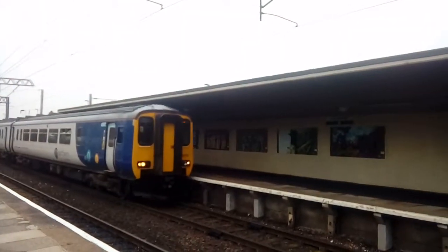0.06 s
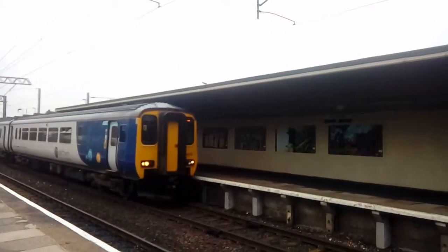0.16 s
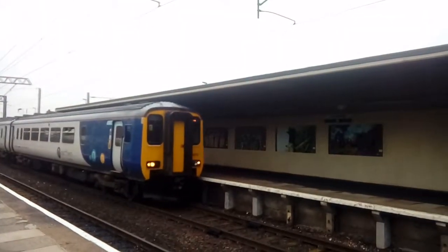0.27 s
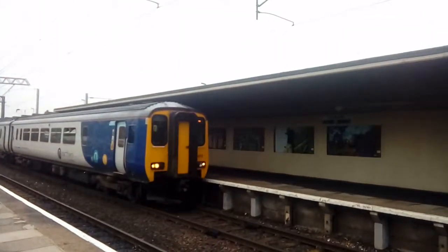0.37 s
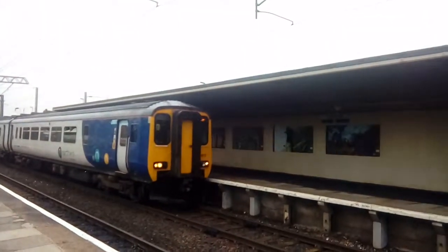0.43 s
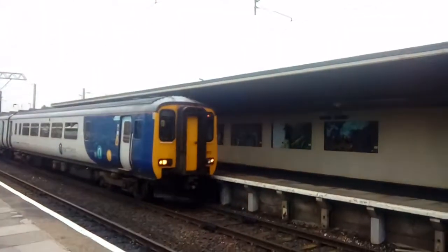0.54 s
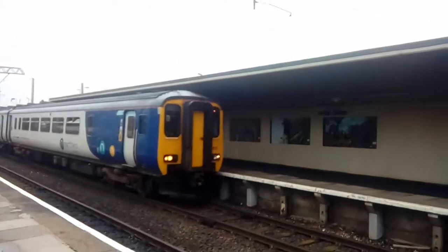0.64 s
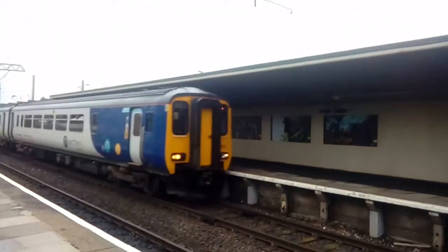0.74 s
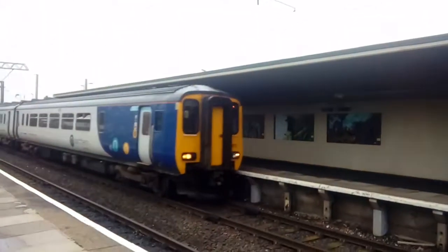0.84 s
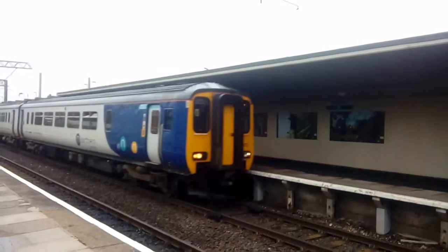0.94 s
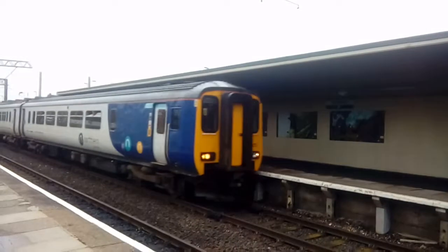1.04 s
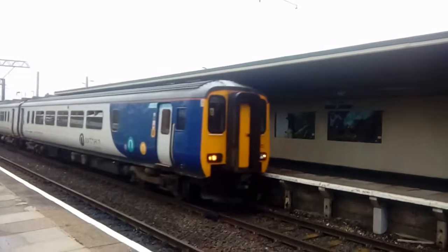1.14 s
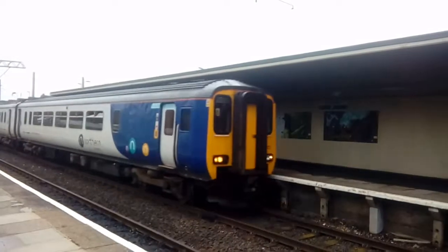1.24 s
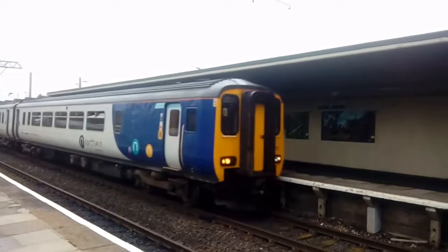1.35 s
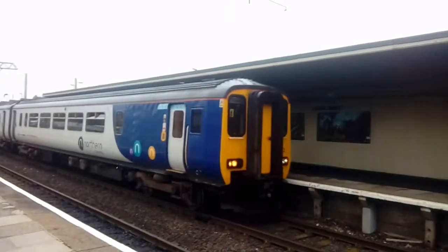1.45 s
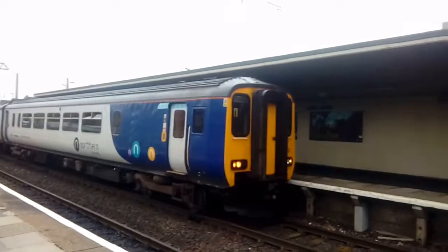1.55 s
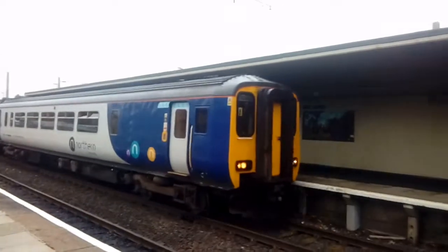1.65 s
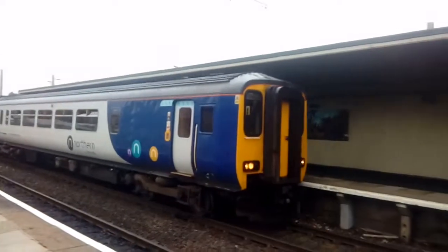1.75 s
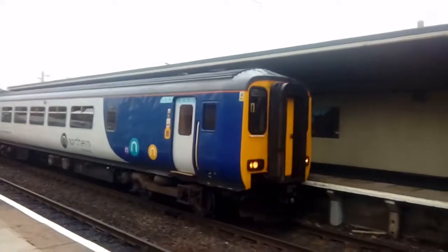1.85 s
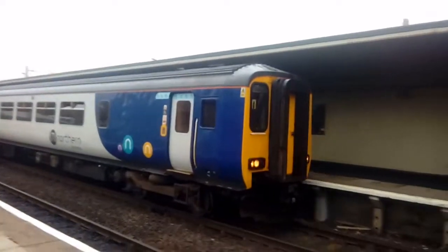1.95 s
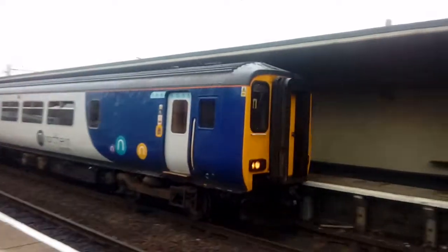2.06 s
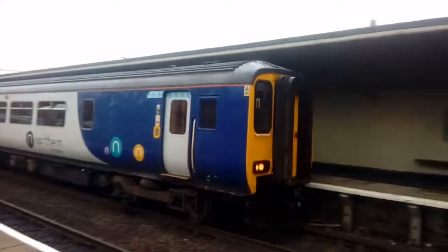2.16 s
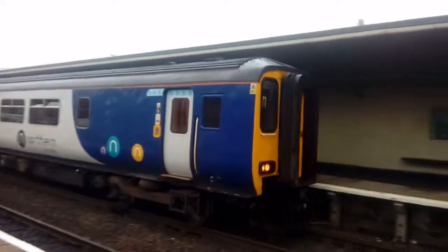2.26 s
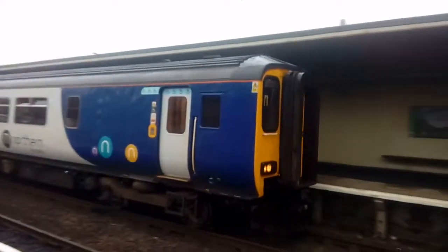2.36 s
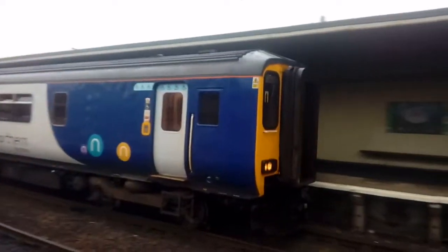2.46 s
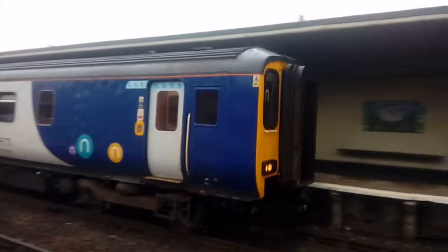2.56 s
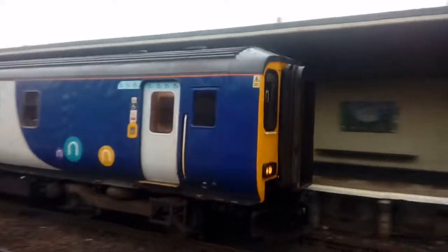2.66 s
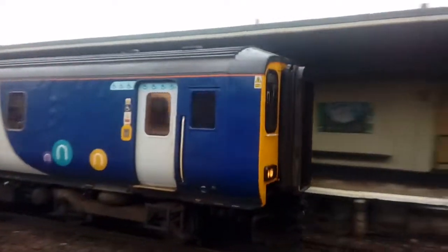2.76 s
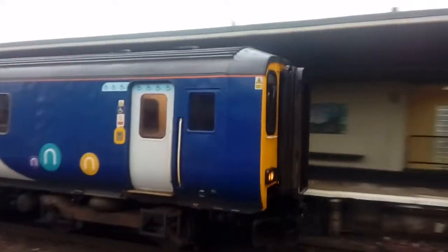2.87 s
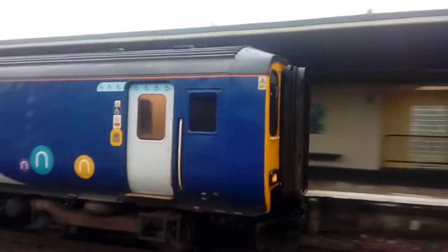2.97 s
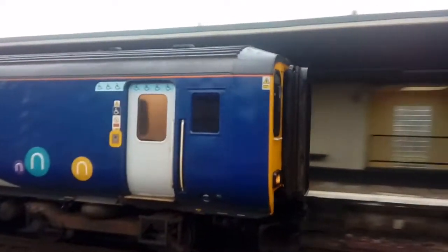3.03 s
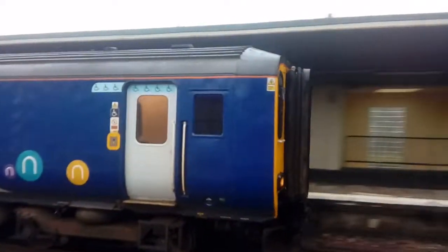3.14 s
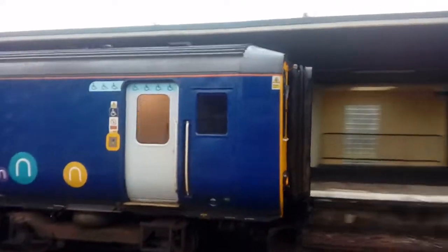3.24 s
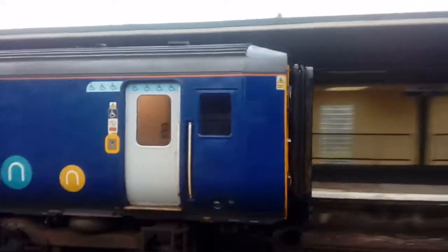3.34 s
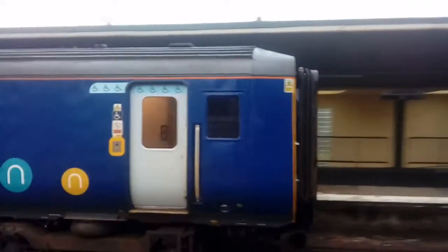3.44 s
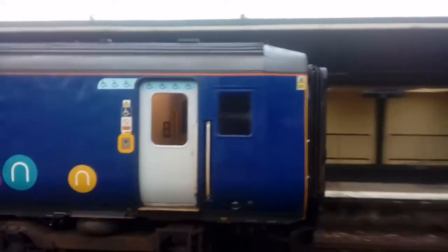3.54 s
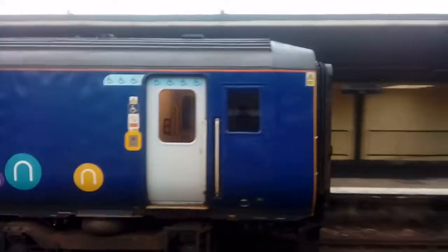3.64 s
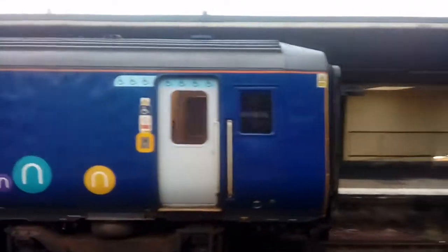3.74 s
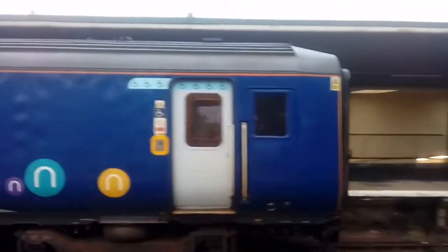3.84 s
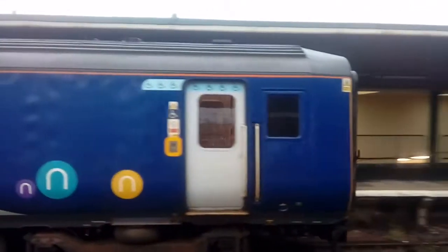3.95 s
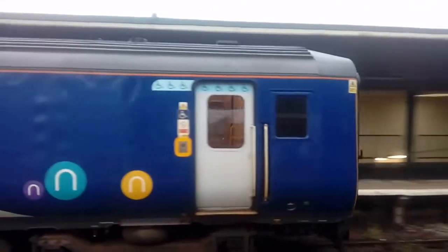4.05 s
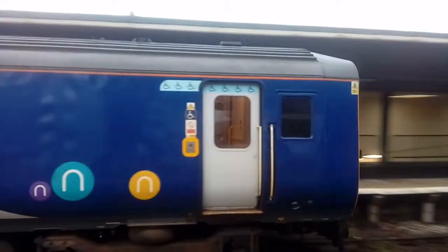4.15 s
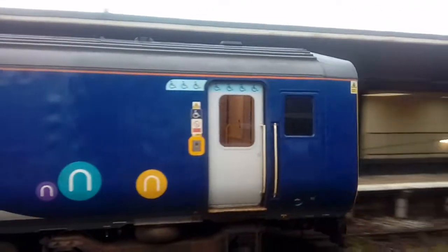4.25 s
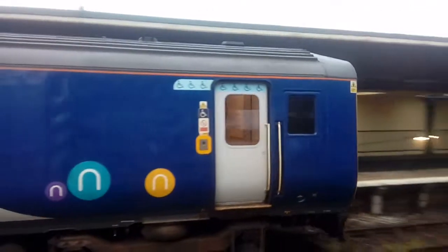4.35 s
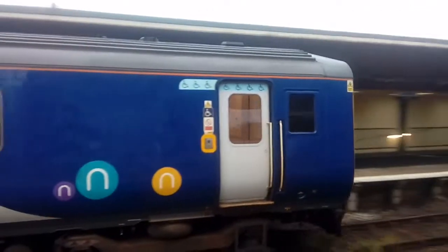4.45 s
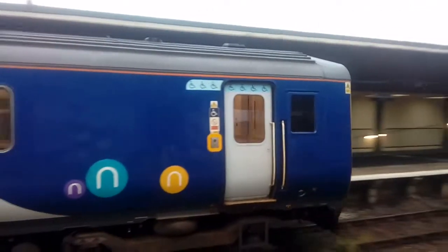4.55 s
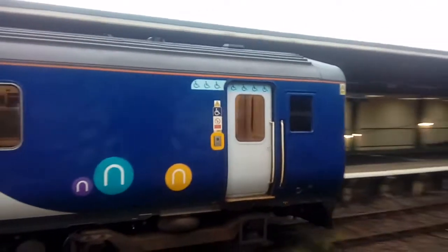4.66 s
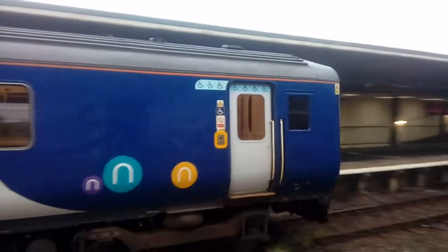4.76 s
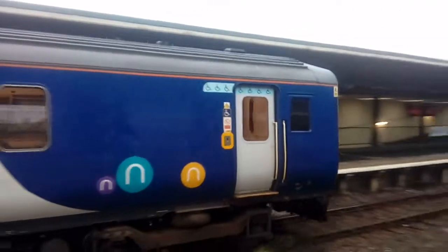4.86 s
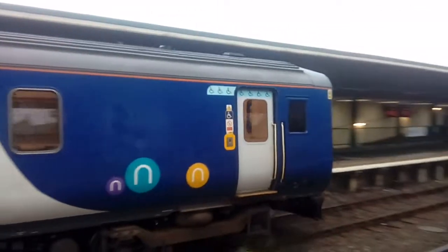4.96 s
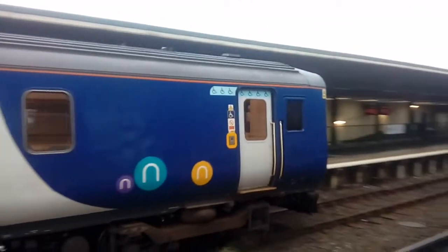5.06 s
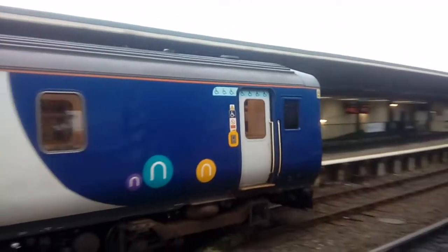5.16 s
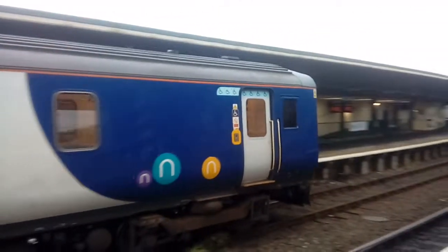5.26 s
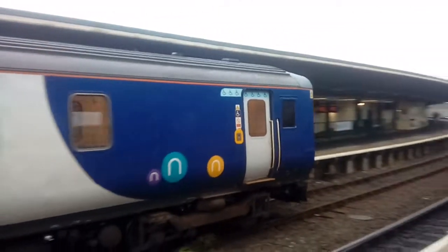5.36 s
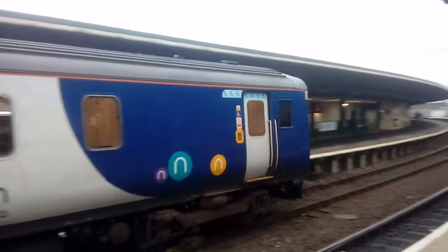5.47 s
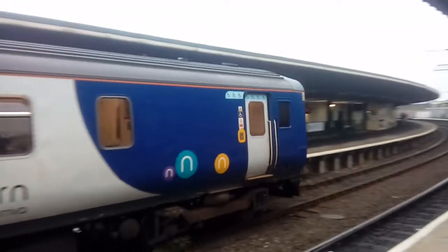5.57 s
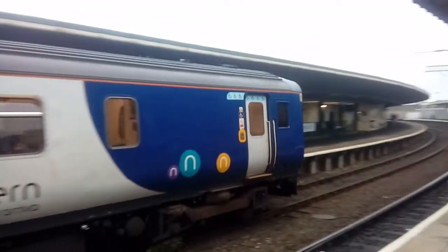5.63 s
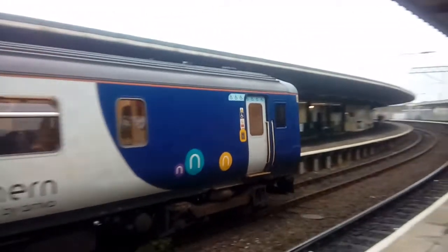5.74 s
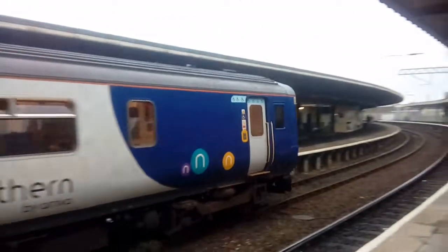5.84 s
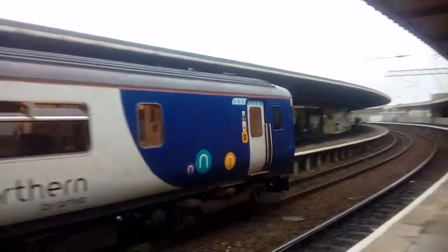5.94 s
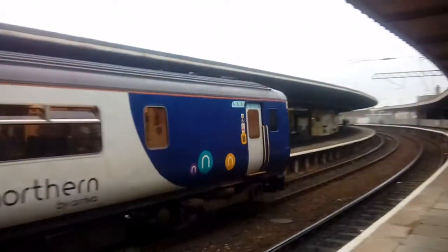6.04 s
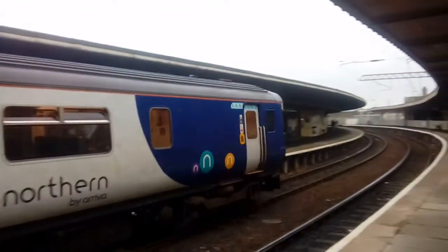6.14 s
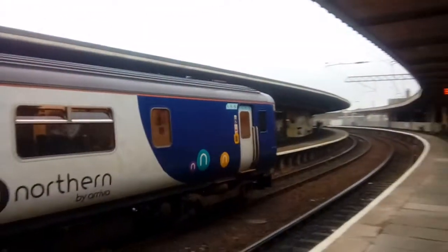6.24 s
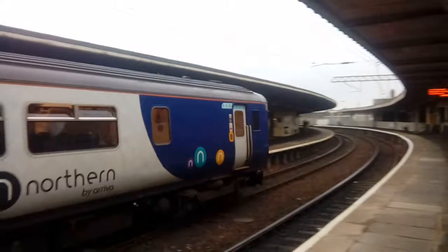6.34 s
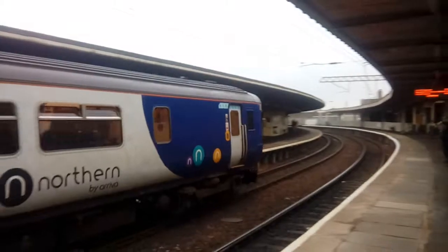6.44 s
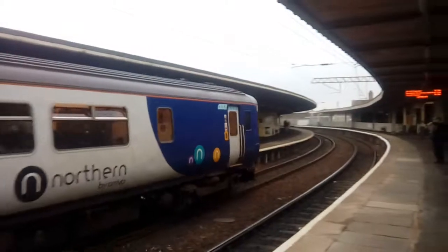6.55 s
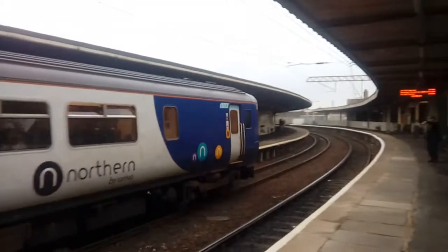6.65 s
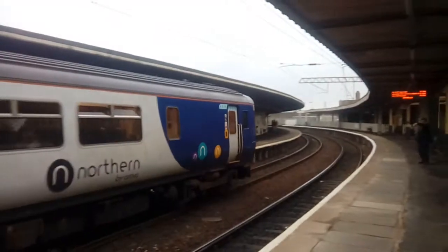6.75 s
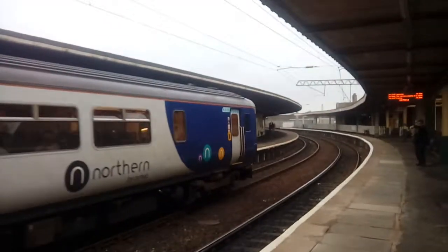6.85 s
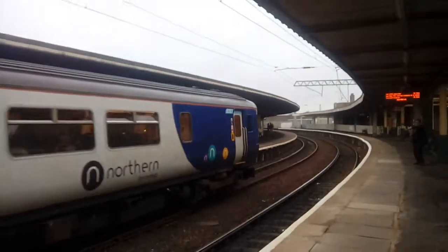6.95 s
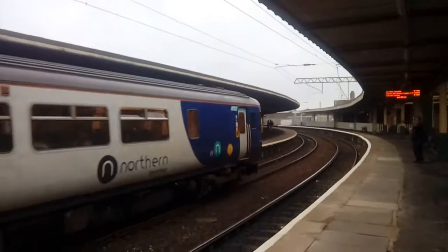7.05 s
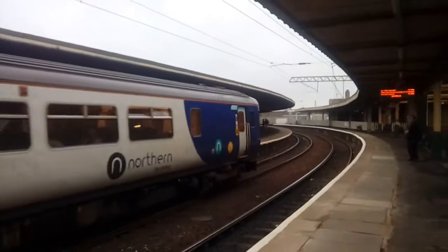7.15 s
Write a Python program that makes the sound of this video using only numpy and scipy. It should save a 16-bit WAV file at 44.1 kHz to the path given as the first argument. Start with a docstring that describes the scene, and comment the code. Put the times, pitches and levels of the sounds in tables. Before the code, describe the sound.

Close pass of a railcar at a covered outdoor platform: rough wheel roar, low ground rumble and rattling diesel knock grow throughout. Metallic joint clanks with short ringing tails punctuate it, wavering wheel tones sing in the middle and again late, and low booms sound under the carriage. Brief airy hisses come and go. The engine is loudest and brightest at the end; small dull-topped microphone, short roof reflections.

```python
"""A railcar roar swells as it passes close to a platform, with clanks, ringing wheels, thuds and short hisses.
Engine clatter grows nearer and brighter towards the end. Rolling, engine and exhaust are shaped noise with
gains set by distance; crankshaft-locked strokes modulate the engine and exhaust. Joints excite decaying
noise and frame modes; whines, booms and hisses are swelling noise bands. Engine and joints echo off the canopy."""
import sys
import numpy as np
from scipy import signal
from scipy.fft import rfft, irfft, next_fast_len
from scipy.io import wavfile
from scipy.ndimage import map_coordinates

SR = 44100
rng = np.random.default_rng(int(sys.argv[2]) if len(sys.argv) > 2 else 0)


def transcribe(signal):
    """Save signal, clipped to [-1, 1], as a 16-bit WAV file at the path in sys.argv[1]."""
    frames = np.atleast_2d(signal).T
    limited = np.clip(frames, -1, 1)
    pcm = np.round(limited * 32767).astype(np.int16)
    wavfile.write(sys.argv[1], SR, pcm)


N = 317520
T = np.arange(N) / SR  # s

SHAFT_HZ = 12.34
SPEED_M_PER_S = 4.1
DISTANCE_M = 4.76  # microphone to the near side of the train
# when each part draws level with the microphone
EXHAUST_PASS_S, FRAME_PASS_S, ENGINE_PASS_S = 4.79, 5.84, 6.91

# firing strength of each cylinder in turn: (relative strength)
CYLINDER_STRENGTHS = [1.16, 0.61, 1.2, 1.1, 0.96, 0.96]


def amp(db):
    """Decibels to gain."""
    return 10 ** (np.asarray(db) / 20)


def unit(x):
    """Scaled to rms 1."""
    return x / np.sqrt(np.mean(x ** 2) + 1e-20)


def along(points, hz):
    """(Hz, value) points interpolated on a log frequency axis."""
    point_hz, values = np.transpose(points)
    return np.interp(np.log(hz + 1), np.log(point_hz + 1), values)


def wobble(knots_per_s):
    """Smooth random curve: a spline through Gaussian knots."""
    knots = rng.standard_normal(int(N * knots_per_s / SR) + 4)
    return map_coordinates(knots, [T * knots_per_s])


def filtered(x, response):
    """x times a response of frequency, zero-padded against wrap-around."""
    size = next_fast_len(N + SR // 2)
    spectrum = rfft(x, size) * response(np.fft.rfftfreq(size, 1 / SR))
    return irfft(spectrum, size)[:N]


def coloured(x, spectrum):
    """x shaped by (Hz, dB) points, at rms 1."""
    return unit(filtered(x, lambda f: amp(along(spectrum, f))))


def resonance(f, centre_hz, width_hz):
    """Response of one damped mode, unity at its centre."""
    return 1j * f * width_hz / (centre_hz ** 2 - f * f + 1j * f * width_hz)


def noise():
    """White noise of rms 1."""
    return rng.standard_normal(N)


def contact(specks_per_s, grit):
    """Rolling contact: fine roughness plus sparse random specks."""
    specks = (rng.random(N) < specks_per_s / SR) * noise()
    return unit(noise() + grit * unit(specks))


def strokes(per_turn, strengths, decay_s, scatter_db, lag_strokes):
    """Envelope of blows locked to the crankshaft, each decaying exponentially; rms 1."""
    stroke_hz = SHAFT_HZ * per_turn
    phase = T * stroke_hz + lag_strokes + 1
    stroke = np.floor(phase).astype(int)
    age_s = (phase - stroke) / stroke_hz
    scatter = amp(scatter_db * rng.standard_normal(stroke.max() + 1))
    size = np.take(strengths, stroke, mode="wrap") * scatter[stroke]
    return unit(size * np.exp(-age_s / decay_s))


def passing(pass_s, far_db, falloff):
    """Gain of a part going by: 1 / distance ** falloff, power-summed with a steady floor for the rest."""
    distance_m = np.hypot(DISTANCE_M, SPEED_M_PER_S * (T - pass_s))
    return np.hypot((DISTANCE_M / distance_m) ** falloff, amp(far_db))


def swells(rows):
    """Resonant bands of noise under Gaussian envelopes; length is the 1/e half-width."""
    out = np.zeros(N)
    for centre_s, length_s, hz, width_hz, db in rows:
        envelope = np.exp(-((T - centre_s) / length_s) ** 2)
        band = unit(filtered(noise(), lambda f: resonance(f, hz, width_hz)))
        out += amp(db) * envelope * band
    return out


def canopy(x, wet_db, count=24):
    """Adds roof and wall echo: each successive piece of x meets a fresh decaying noise tail."""
    # reverberation time: (frequency [Hz], t60 [s])
    decay_times = [(100, 0.38), (1000, 0.19), (10000, 0.33)]
    hz, t, bins = signal.stft(rng.standard_normal((count, SR // 2)), SR, nperseg=256)
    decay = amp(-60 * t / along(decay_times, hz)[:, None])
    tails = signal.istft(bins * decay, SR, nperseg=256)[1]
    echo, start = np.zeros(N + SR), 0
    for piece, tail in zip(np.array_split(x, count), tails):
        answer = signal.fftconvolve(piece, tail / np.linalg.norm(tail))
        echo[start:start + len(answer)] += answer
        start += len(piece)
    return x + amp(wet_db) * echo[:N]


def rolling():
    """Rough wheels on rough rails shake the ground, track, wheel discs and underframe."""
    # rail roughness under the wheels: (time [s], level [dB])
    roughness = [(0, 0), (.7, -3), (1.45, 2), (2.5, 0.2), (4.2, -1), (4.7, 2), (6.4, -1), (7.0, 2)]
    # spectrum of the ground rumble: (frequency [Hz], relative level [dB])
    rumble_spectrum = [(20, -19.5), (30, -12.5), (45, -0.5), (62, 0), (85, 0.5), (125, -2.5), (180, -9.5),
                       (300, -8), (600, -46)]
    # spectrum of the track roar: (frequency [Hz], relative level [dB])
    track_spectrum = [(120, -46), (240, -25.5), (330, -15), (420, -5.5), (520, -1.5), (660, 1), (760, -5.5),
                      (1000, -35), (2500, -63)]
    # spectrum of the wheel discs: (frequency [Hz], relative level [dB])
    wheel_spectrum = [(350, -47.5), (620, -16.5), (730, -1.5), (830, 1.5), (960, -0.5), (1080, -5),
                      (1250, -8.5), (1500, -21), (3000, -55)]
    # spectrum of the underframe drone: (frequency [Hz], relative level [dB])
    underframe_spectrum = [(100, -27.5), (190, -4.5), (250, 0), (380, 0.5), (480, -6), (800, -37)]
    rough_db = np.interp(T, *np.transpose(roughness))

    rumble_gain = amp(-44.6 + rough_db) * passing(ENGINE_PASS_S, far_db=-4.5, falloff=0.6)
    rumble = rumble_gain * coloured(noise(), rumble_spectrum)

    # the rails carry the roar along, so it fades slowly with distance
    track_gain = amp(-30.5 + rough_db + 1.6 * wobble(11))
    track_gain = track_gain * passing(ENGINE_PASS_S, far_db=-21.5, falloff=0.47)
    track = track_gain * coloured(contact(specks_per_s=300, grit=0.35), track_spectrum)

    wheel_gain = amp(-24 + 0.83 * wobble(14)) * passing(ENGINE_PASS_S, far_db=-20, falloff=1.0)
    wheels = wheel_gain * coloured(contact(specks_per_s=330, grit=0.34), wheel_spectrum)

    drone_gain = amp(-40 + rough_db) * passing(FRAME_PASS_S, far_db=-28.5, falloff=1.12)
    drone = drone_gain * coloured(noise(), underframe_spectrum)
    return rumble + track + wheels + drone


def whines():
    """Faint whines and squeaks of the running gear, as narrow noise bands."""
    # whines: (centre [s], length [s], frequency [Hz], width [Hz], level [dB])
    whine_rows = [(2.68, 0.49, 615, 20, -40.5), (1.2, 2.4, 3050, 100, -51.5), (1.675, .03, 3600, 50, -40.5),
                  (6.8, .5, 3000, 40, -50)]
    return swells(whine_rows)


def booms():
    """Low booms and thuds from under the carriage, as short resonant noise."""
    # booms: (centre [s], length [s], frequency [Hz], width [Hz], level [dB])
    boom_rows = [(5.255, .041, 125, 110, -34), (5.35, 0.13, 400, 300, -31.5), (5.88, 0.13, 550, 50, -28.5),
                 (5.931, 0.014, 125, 150, -26.5), (5.99, .05, 85, 60, -35)]
    return swells(boom_rows)


def brake_hisses():
    """Short brake hisses, as high noise bands."""
    # hisses: (centre [s], length [s], frequency [Hz], width [Hz], level [dB])
    hiss_rows = [(0.034, 0.069, 6500, 4000, -40.5), (2.844, 0.08, 6960, 3000, -42.5),
                 (3.47, 0.042, 6960, 4000, -40), (4.75, 0.095, 6470, 500, -38), (4.73, .11, 9650, 600, -39),
                 (6.57, 0.048, 5200, 500, -33)]
    return swells(hiss_rows)


def singing(rest_db=-52):
    """Wheels ring in two modes; flange rubbing lifts the higher one, a noise band plus a wavering tone."""
    # flanges rubbing on the curve: (start [s], end [s], level [dB])
    rubs = [(3.02, 4.45, -36.5), (5.3, 6.6, -35.5), (6.083, 6.477, -30.5)]
    attack_s, release_s = 0.23, 0.23
    low = unit(filtered(noise(), lambda f: resonance(f, centre_hz=555.0, width_hz=34) ** 2))
    rub = unit(filtered(noise(), lambda f: resonance(f, centre_hz=904, width_hz=53) ** 2))
    pitch_hz = 889 + 6 * wobble(20)
    tone = np.sqrt(2) * np.sin(2 * np.pi * np.cumsum(pitch_hz) / SR)
    pressure = amp(rest_db)
    for start_s, end_s, db in rubs:
        attack = np.clip((T - start_s) / attack_s, 0, 1)
        release = np.exp(-np.maximum(T - end_s, 0) / release_s)
        pressure = pressure + amp(db) * attack * release
    low_gain = amp(-36.5) * passing(ENGINE_PASS_S, far_db=-9.5, falloff=1.5)
    high = unit(0.72 * rub + tone * amp(2.5 * wobble(16)))
    return low_gain * low + pressure * high


def exhaust():
    """Puffs of gas boom in the silencer, loudest when it is right opposite."""
    puffs = strokes(per_turn=3, strengths=CYLINDER_STRENGTHS, decay_s=0.008, scatter_db=-0.2, lag_strokes=.45)
    gas = puffs * (noise() + 0.043)  # the offset adds a regular pulse to the turbulence
    boom = filtered(gas, lambda f: resonance(f, centre_hz=120.3, width_hz=76) ** 2)
    return amp(-39.3) * passing(EXHAUST_PASS_S, far_db=-21, falloff=7.2) * unit(boom)


def joints(clank_t60_s=0.38, ring_t60_s=0.39, thump_t60_s=0.46):
    """Each wheel blow rattles and rings the bogie frame and thumps the sleepers."""
    # wheels striking the track: (time [s], clank [dB], frame ring [dB], thump [dB])
    blows = [(0.0, -29.5, -39, -64), (1.621, -20, -33, -32.5), (2.245, -19, -23.5, -33),
             (3.379, -30.5, -40, -48), (3.94, -32, -40, -44), (4.649, -30, -32, -48),
             (5.279, -30.5, -40, -46), (5.403, -20, -32, -35), (6.009, -25, -32, -33),
             (6.319, -36, -40, -32), (7.029, -27, -34, -37)]
    # modes of the bogie frame: (frequency [Hz], relative level [dB])
    frame_modes = [(605, 0), (705, -5), (810, -2), (1015, -12)]
    # spectrum of the clank: (frequency [Hz], relative level [dB])
    clank_spectrum = [(100, -23), (280, -12.5), (450, -7), (600, 3), (820, -1.5), (1050, -0.5),
                      (1500, -13.5), (2400, -14), (4000, -20.5), (6500, -21.5), (12000, -26.5)]
    # spectrum of the sleeper thump: (frequency [Hz], relative level [dB])
    sleeper_spectrum = [(20, -21), (45, -14), (57, 2.5), (62, 4), (68, -2.5), (80, -12), (130, -20.5),
                        (250, -17), (500, -51.5)]
    clank, ring, thump = np.zeros((3, N))
    for blow_s, clank_db, ring_db, thump_db in blows:
        age_s = np.maximum(T - blow_s, 0)
        rise = 1 - np.exp(-age_s / .004)
        clank += rise * amp(clank_db - 60 * age_s / clank_t60_s)
        ring += rise * amp(ring_db - 60 * age_s / ring_t60_s)
        thump += rise * amp(thump_db - 60 * age_s / thump_t60_s)
    frame = np.zeros(N)
    for hz, db in frame_modes:
        frame += amp(db) * np.sin(2 * np.pi * hz * T + .7 * wobble(60))
    rattle = clank * coloured(noise(), clank_spectrum)
    return rattle + ring * unit(frame) + thump * coloured(noise(), sleeper_spectrum)


def engine():
    """Six cylinders knock three times a turn; the valve gear ticks twice a turn."""
    # spectrum of the knock: (frequency [Hz], relative level [dB])
    clatter_spectrum = [(600, -31), (1150, -1), (1400, -1.5), (1700, -0.5), (2350, -2.5), (2600, -6),
                        (2850, -5), (3050, -3), (3400, -7), (3900, -8.5), (4600, -16.5), (7000, -46)]
    # spectrum of the ticks: (frequency [Hz], relative level [dB])
    sizzle_spectrum = [(2500, -30), (3700, -8), (4300, -1), (4850, -2), (5300, 1.5), (5650, -.5), (6400, 0),
                       (8000, -2.5), (13000, -5)]
    firing = strokes(per_turn=3, strengths=CYLINDER_STRENGTHS, decay_s=0.011, scatter_db=0.0, lag_strokes=.45)
    valves = strokes(per_turn=2, strengths=[1.15, .85], decay_s=0.0055, scatter_db=2.5, lag_strokes=.55)
    knock = coloured(noise() + 0.37 * firing * noise(), clatter_spectrum)
    ticks = coloured(noise() + 0.34 * valves * noise() + 0.17 * firing * noise(), sizzle_spectrum)

    # from afar the highest treble is screened by the carriage side
    screened = np.interp(T, [1.4, 5.5], [.75, 0])
    treble = filtered(ticks, lambda f: 1 / (1 + (7000 / (f + 1)) ** 12))
    ticks = ticks - screened * treble

    # the knock gains 2 dB as the engine comes out from behind the bogie
    in_view_s, rise_s, in_view_db = 6.48, 0.07, 2
    in_view = np.clip((T - in_view_s) / rise_s, 0, 1)
    knock_gain = amp(-25.5 - in_view_db * (1 - in_view))
    knock_gain = knock_gain * passing(ENGINE_PASS_S, far_db=-18, falloff=0.95)
    tick_gain = amp(-28.9) * passing(ENGINE_PASS_S, far_db=-23.5, falloff=0.82)
    return knock_gain * knock + tick_gain * ticks


def scene():
    """The whole train beside the platform; only engine and joints feed the canopy echo."""
    gear = rolling() + whines() + booms() + brake_hisses() + singing()
    return (gear + exhaust() + canopy(joints() + engine(), wet_db=-10.5))[None]


def record(dry):
    """Small microphone: a low-mid notch, a dull top, a faint hiss of its own and a sharp upper band limit."""
    # treble response: (frequency [Hz], gain [dB])
    mic_response = [(20, 0), (6600, 0), (6900, -6.5), (7300, -7), (7900, -15), (9000, -20.5), (10000, -25),
                    (11500, -36.5), (13000, -46.5)]
    # spectrum of the self-noise: (frequency [Hz], relative level [dB])
    hiss_spectrum = [(1000, -10), (13500, -8.5), (14800, 0), (16000, 1.5)]
    top_hz = 15750

    def response(f):
        """Notch times treble roll-off."""
        notch = 1 - 0.92 * resonance(f, centre_hz=215.3, width_hz=112)
        return notch * amp(along(mic_response, f))

    heard = filtered(dry[0], response)
    hiss = amp(-73.5) * coloured(noise(), hiss_spectrum)
    return filtered(heard + hiss, lambda f: f < top_hz)[None]


dry = scene()
out = record(dry)
transcribe(out)
```